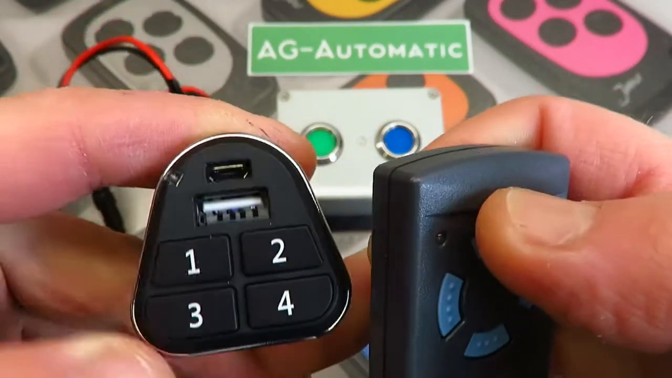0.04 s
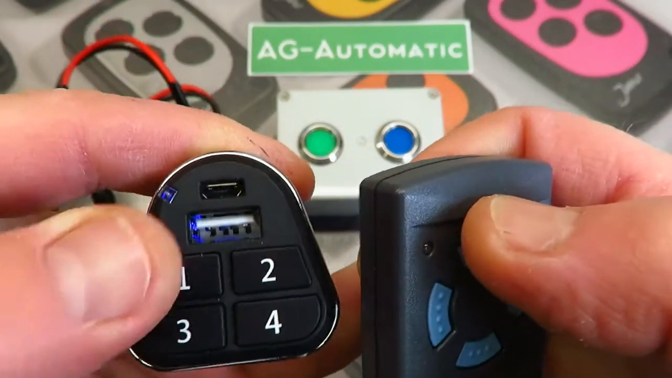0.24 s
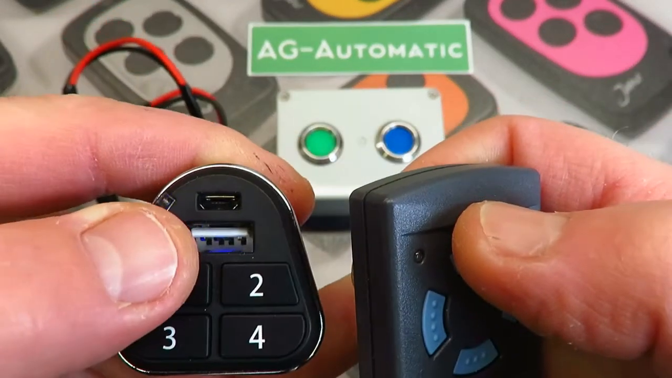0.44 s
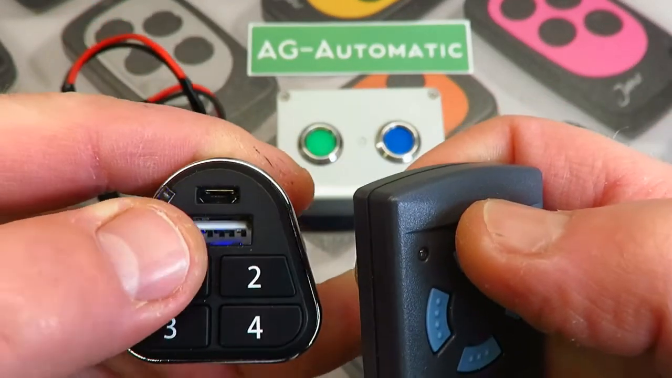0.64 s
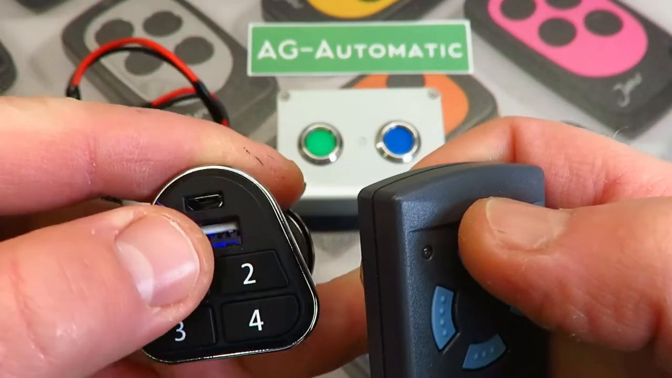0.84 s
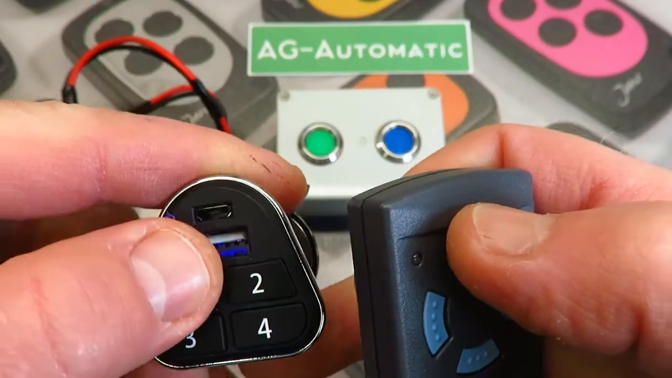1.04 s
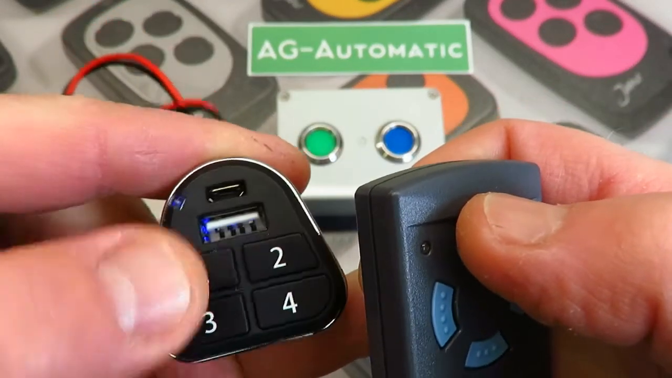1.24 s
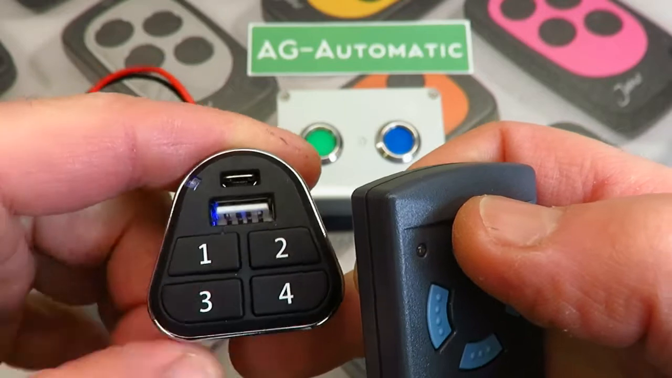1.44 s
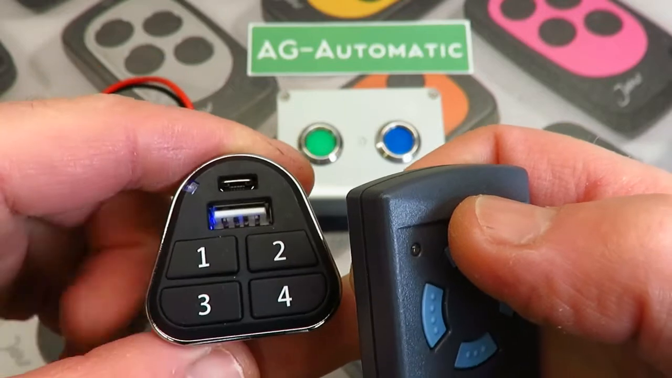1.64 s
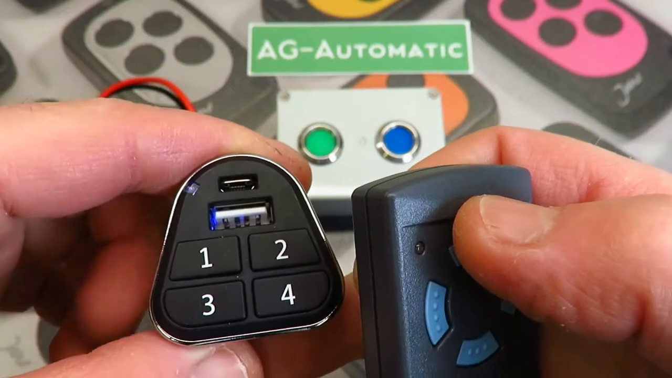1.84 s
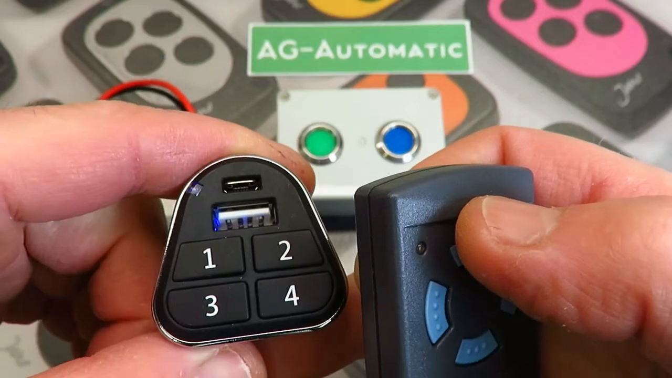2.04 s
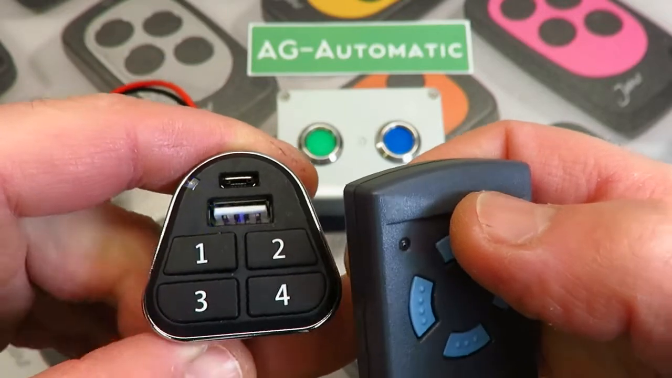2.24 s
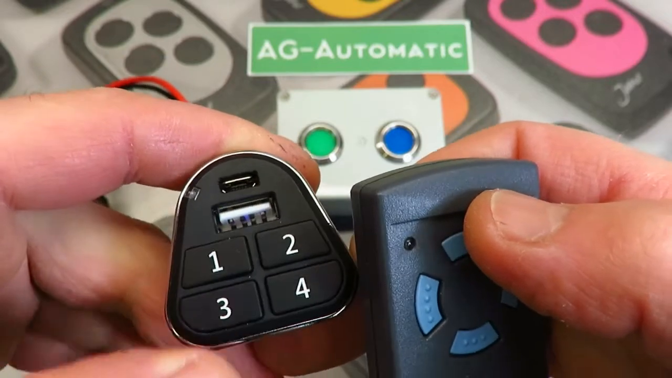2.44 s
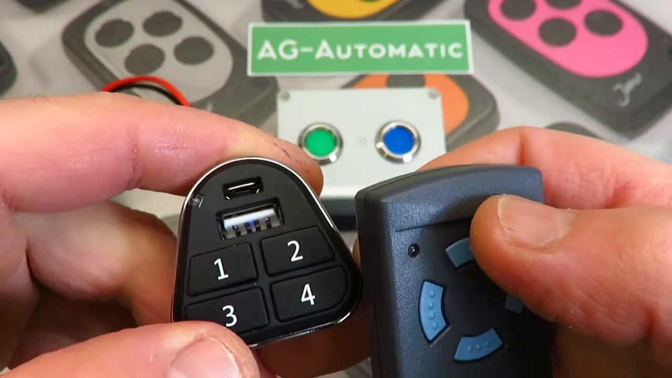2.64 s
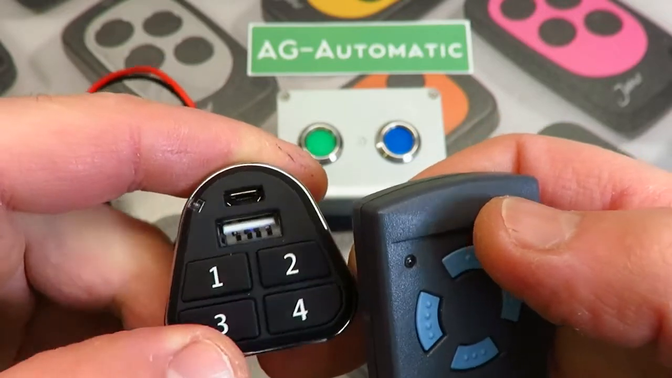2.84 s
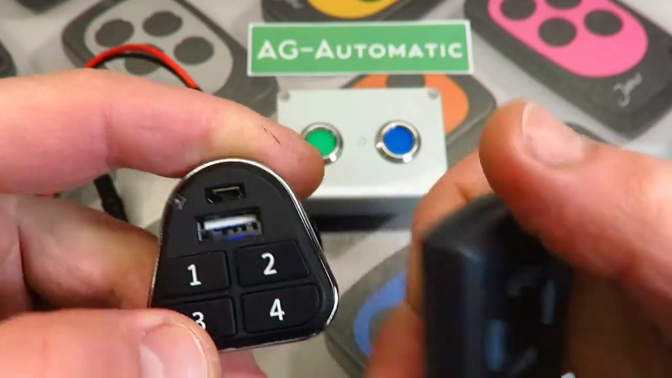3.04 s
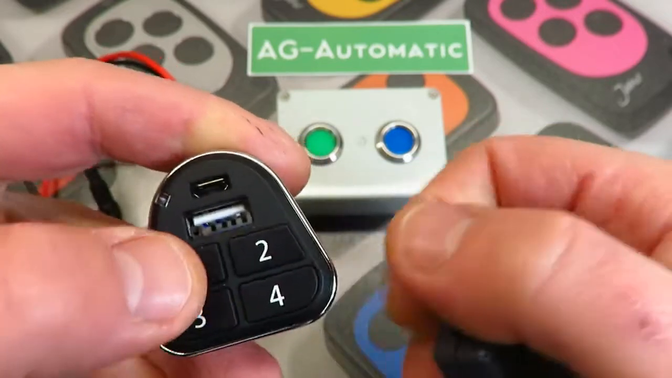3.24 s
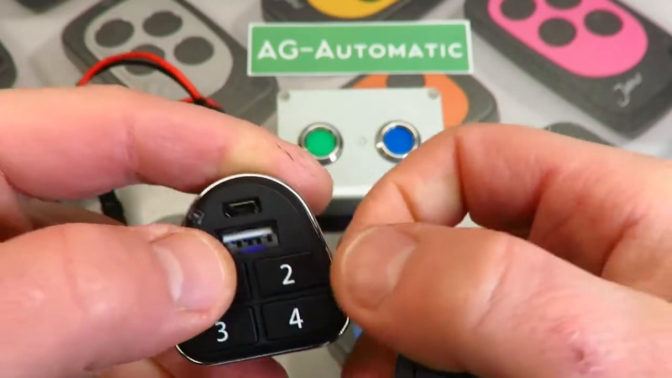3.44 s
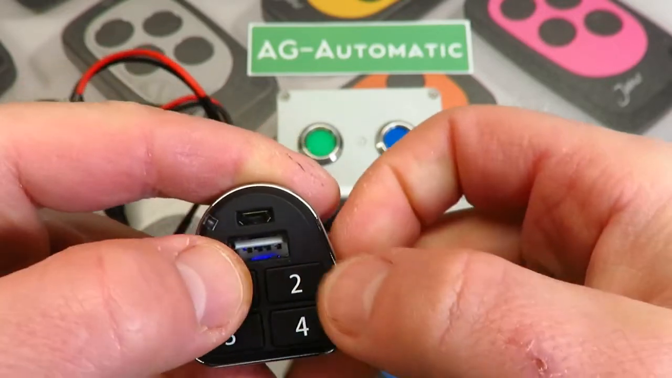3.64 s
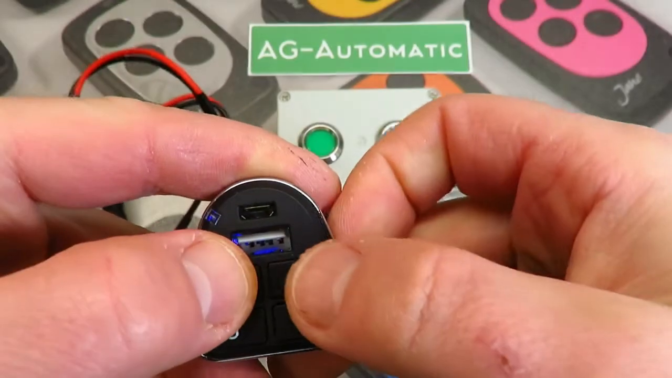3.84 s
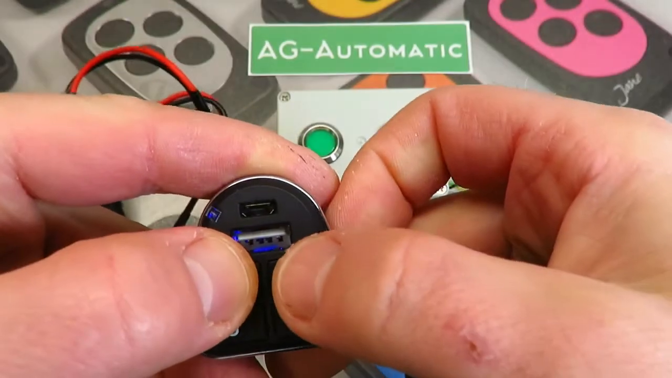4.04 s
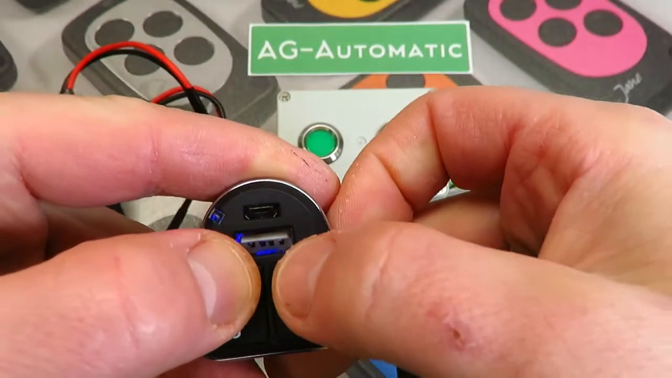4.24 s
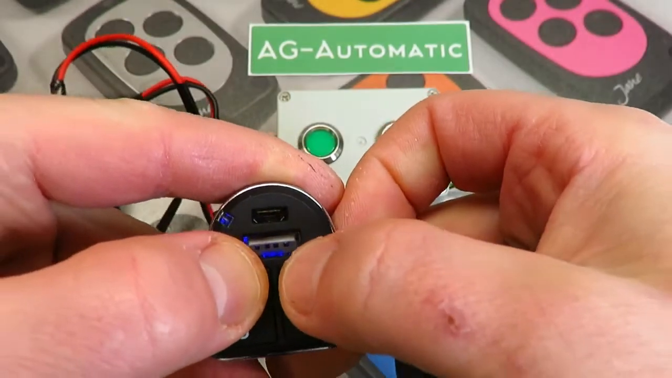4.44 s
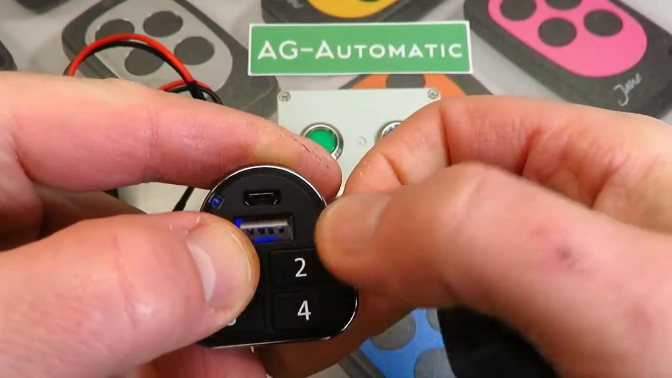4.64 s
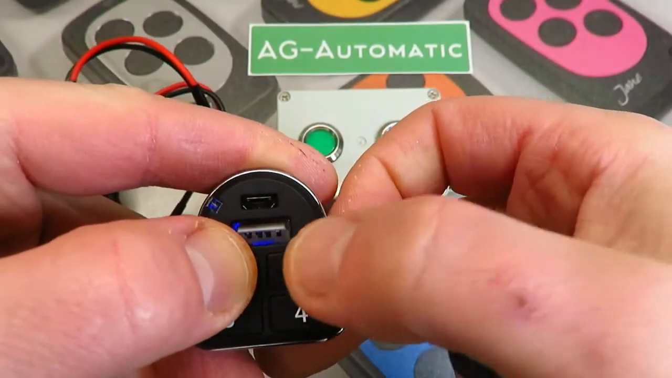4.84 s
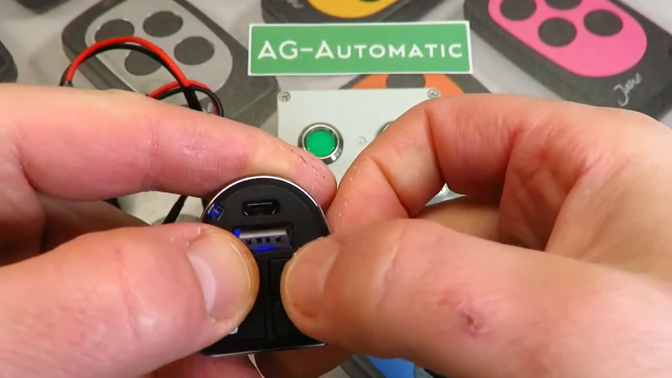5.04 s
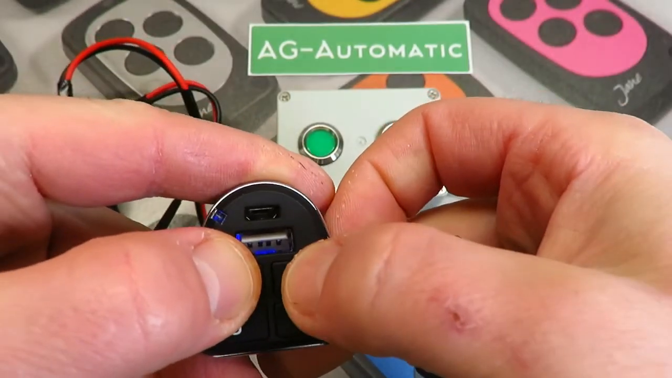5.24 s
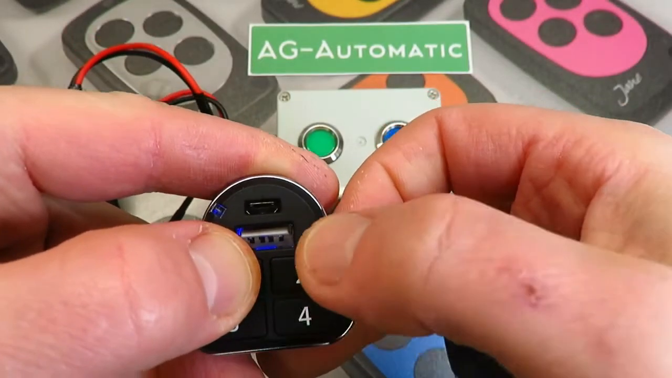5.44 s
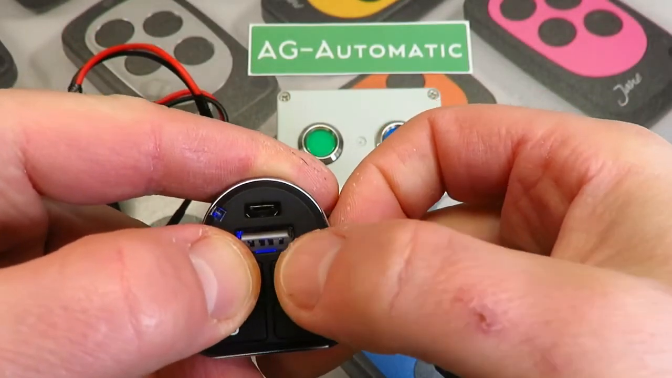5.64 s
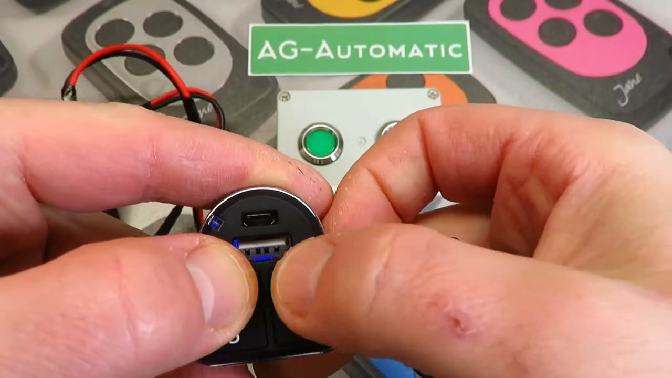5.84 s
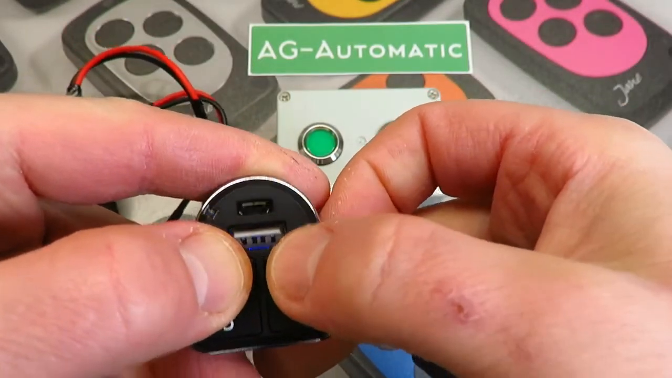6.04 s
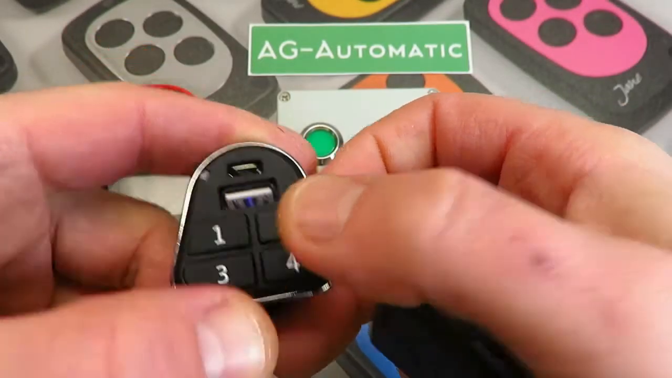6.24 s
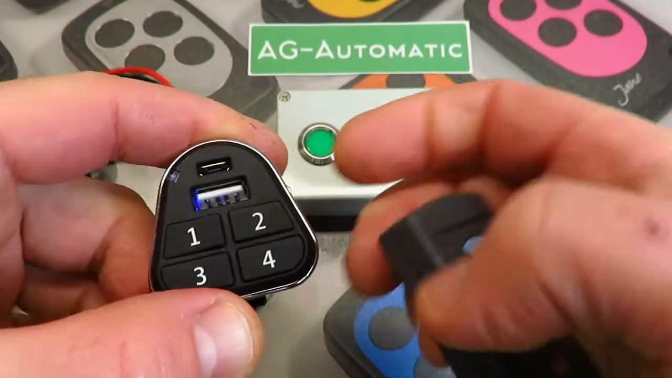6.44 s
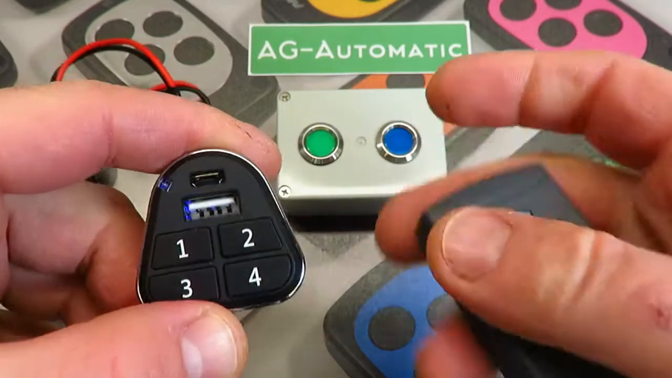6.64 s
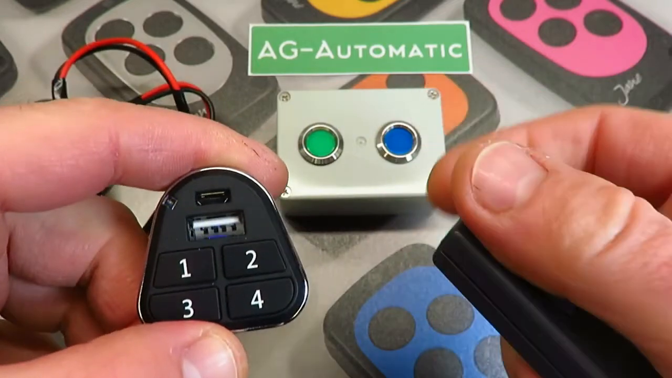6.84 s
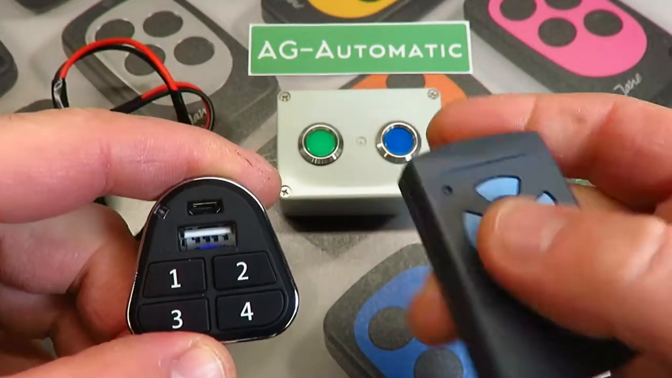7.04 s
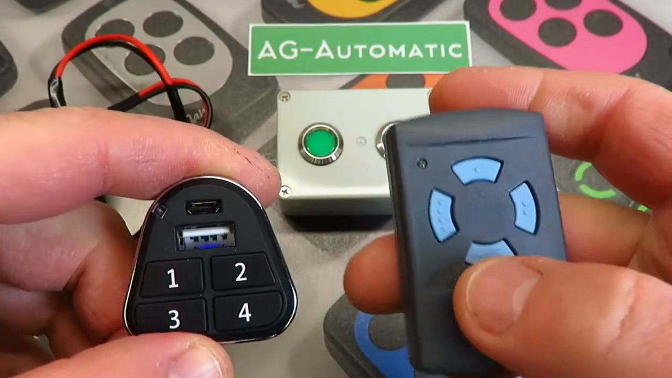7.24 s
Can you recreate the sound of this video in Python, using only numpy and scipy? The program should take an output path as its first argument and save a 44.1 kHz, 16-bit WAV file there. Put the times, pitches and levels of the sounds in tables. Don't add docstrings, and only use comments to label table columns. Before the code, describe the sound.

Small handheld remote keys snap crisply, some hard, some soft, then fingers scuff and squeak over plastic while a sleeve brushes the table.

```python
import sys
import numpy as np
from scipy import signal
from scipy.fft import rfft, irfft
from scipy.io import wavfile
from scipy.ndimage import uniform_filter1d

SR = 44100
rng = np.random.default_rng(int(sys.argv[2]) if len(sys.argv) > 2 else 0)


def digitize_waveform(pressure):
    field = np.atleast_2d(pressure).T
    bounded = np.clip(field, -1, 1)
    quanta = np.round(bounded * 32767).astype(np.int16)
    wavfile.write(sys.argv[1], SR, quanta)


def volts(x):
    e = np.asarray(x, float) / 20
    return 10 ** e


N = 322371
OPPOSITE = np.array([[1], [-1]])


def rms_one(x):
    return x / np.sqrt(np.mean(x ** 2) + 1e-20)


def resonance(x, hz, width_hz):
    r = np.exp(-np.pi * width_hz / SR)
    top = np.array([1, 0, -1]) * (1 - r * r) / 2
    return signal.lfilter(top, [1, -2 * r * np.cos(2 * np.pi * hz / SR), r * r], x)


def resonance_twice(x, hz, width_hz):
    return resonance(resonance(x, hz, width_hz), hz, width_hz)


def shaped(x, spectrum):
    hz, level_db = np.transpose(spectrum)
    grid = np.maximum(np.fft.rfftfreq(N, 1 / SR), 1)
    gain = volts(np.interp(np.log(grid), np.log(hz), level_db))
    return rms_one(irfft(rfft(x) * gain, N))


def patchy(x, depth_db):
    hz, _, spectrum = signal.stft(x, SR, nperseg=1024)
    field = rng.standard_normal(spectrum.shape)
    field = uniform_filter1d(uniform_filter1d(field, size=7, axis=0), size=5, axis=1)
    depth_db = depth_db * np.minimum(hz / 1500, 1)[:, None]
    uneven = spectrum * volts(depth_db * rms_one(field))
    return rms_one(signal.istft(uneven, nperseg=1024)[1][:N])


def stroke(rows, peaks_db, rest_db):
    t, out = np.arange(N) / SR, np.full(N, volts(rest_db))
    for (s, rise_s, fall_s, *_), peak_db in zip(rows, peaks_db):
        near = slice(max(0, round((s - 3 * rise_s) * SR)), round((s + 3 * fall_s) * SR))
        since = t[near] - s
        drop_db = 20 * np.where(since < 0, -since / rise_s, since / fall_s)
        out[near] += volts(peak_db - drop_db)
    return uniform_filter1d(out, size=400)


GROUP_EDGES_HZ = [1700, 4100, 8500]


def snaps(hits, dome, shell, lean_db, lag_s, rattle_db, shell_db, cut_hz):
    delay_s = 0.0009
    out, t = np.zeros((2, N + 8000)), np.arange(4000) / SR
    late = np.maximum(t - np.array([[0], [lag_s]]), 0)
    for s, peak_db, low_db, bright_db, air_db in hits:
        ring_db = shell_db - 0.12 * peak_db
        group = volts(np.array([low_db + 7, 0, bright_db + 8.5, air_db + 13.0]))
        phase, wobble = rng.uniform(0, 2 * np.pi, 20), rng.normal(0, 1, (20, 3))
        middle, side = rng.standard_normal((2, len(t)))
        sound = 0
        for k, (hz, length_s, t60) in enumerate(dome):
            swell = np.sin(np.pi * np.minimum(late / length_s, 1) ** 0.53)
            burst = swell * np.sin(2 * np.pi * hz * late + phase[k])
            loose = (middle + 0.3 * side * OPPOSITE) * volts(rattle_db + ring_db - 60 * t / t60)
            sound = sound + group[k] * (burst + resonance_twice(loose, hz, 0.66 * hz))
        for k, (hz, level_db, t60) in enumerate(shell):
            fade = volts(-60 * late / t60) * (1 - np.exp(-late / 0.00052))
            scatter_db = 3.0 * wobble[k, 0] + 0.5 * wobble[k, 1] * OPPOSITE
            strength = group[np.searchsorted(GROUP_EDGES_HZ, hz)] * volts(level_db + ring_db + scatter_db)
            gripped_hz = hz * (1 + 0.017 * wobble[k, 2])
            sound = sound + strength * fade * np.sin(2 * np.pi * gripped_hz * late + phase[k + 4])
        at = round((s + delay_s) * SR)
        out[:, at:at + len(t)] += volts(peak_db) * sound / np.abs(sound.mean(axis=0)).max()
    too_small_for_bass = signal.butter(3, cut_hz, "high", fs=SR, output="sos")
    out = signal.sosfilt(too_small_for_bass, out[:, :N] + 1e-18)
    ports_roll_off = signal.butter(4, 14000, fs=SR, output="sos")
    return signal.sosfilt(ports_roll_off, out) * volts([[lean_db / 2], [-lean_db / 2]])


# start_s [s], peak_db, low_db, bright_db, air_db [dB]
LEFT_KEY = [
    (0.2015, -28.5, -24, -7, -6),
    (1.0899, -6, -29, -6, -28),
    (1.304, -14, -16, -32, -33.5),
    (1.3448, -36.5, -33, -22, -45),
    (6.2571, -12, -15.5, -24, -32),
    (6.9585, -13.5, -39, -30, -27),
    (0.5004, -19, -16.5, -2, -32),
]
# pitch_hz [Hz], burst_s [s], rattle_t60_s [s]
LEFT_DOME = [(1420, 0.0037, 0.025), (2430, 0.0035, 0.025), (4100, 0.00056, 0.017), (12100, 0.00099, 0.025)]
# pitch_hz [Hz], level_db [dB in its group], t60_s [s]
LEFT_SHELL = [(872, 4, 0.025), (1360, 20, 0.015), (1770, -30, 0.02), (2218, 10.5, 0.024),
              (2690, -45, 0.057), (2800, -2.5, 0.022), (3810, -11, 0.024), (4200, -13, 0.021),
              (4740, -4.5, 0.036), (5140, -22, 0.023)]


def left_key():
    return snaps(LEFT_KEY, LEFT_DOME, LEFT_SHELL,
                 lean_db=1.5, lag_s=0.00002, rattle_db=6.5, shell_db=-11, cut_hz=520)


# start_s [s], peak_db, low_db, bright_db, air_db [dB]
RIGHT_KEY = [
    (4.4526, -3.5, -32, -12, -29.5),
    (5.2604, -2, -50, -10.5, -22),
    (5.9972, -3.5, -20.5, -10.5, -22),
]
# pitch_hz [Hz], burst_s [s], rattle_t60_s [s]
RIGHT_DOME = [(1620, 0.0041, 0.062), (2800, 0.0011, 0.03), (4860, 0.0016, 0.022), (10600, 0.00038, 0.0079)]
# pitch_hz [Hz], level_db [dB in its group], t60_s [s]
RIGHT_SHELL = [(1410, 9, 0.013), (1810, -14.5, 0.031), (2290, -2.5, 0.023), (2405, -3.5, 0.0067),
               (2630, -18, 0.012), (3220, -23, 0.045), (3940, -9.5, 0.017), (4560, 3, 0.018),
               (4860, -18, 0.018), (5530, -0.5, 0.0089), (5900, -17, 0.023), (6400, -6, 0.02)]


def right_key():
    return snaps(RIGHT_KEY, RIGHT_DOME, RIGHT_SHELL,
                 lean_db=0.5, lag_s=0.00002, rattle_db=9.5, shell_db=-13.5, cut_hz=1320)


# start_s [s], peak_db, low_db, bright_db, air_db [dB]
BRIGHT_PRESS = [
    (3.875, -1, -20.5, -9.5, -36),
    (3.9419, -30, -40, -21, -53.5),
]
# pitch_hz [Hz], burst_s [s], rattle_t60_s [s]
BRIGHT_DOME = [(1340, 0.0017, 0.026), (2730, 0.0022, 0.015), (7040, 0.0011, 0.016), (11600, 0.00066, 0.017)]


def bright_press():
    return snaps(BRIGHT_PRESS, BRIGHT_DOME, RIGHT_SHELL,
                 lean_db=0.5, lag_s=0.00002, rattle_db=4.0, shell_db=-7.5, cut_hz=690)


# start_s [s], peak_db, low_db, bright_db, air_db [dB]
RELEASES = [
    (4.6891, -13.5, -19.5, -18.5, -24.5),
    (5.1195, -28, -20, -13.5, -20.5),
    (5.441, -20, -24, -32, -44),
    (5.4534, -38, -29, -29, -38),
    (5.5078, -39, -21, -25, -30),
    (5.8138, -33.5, -33, -24, -27),
]
# pitch_hz [Hz], burst_s [s], rattle_t60_s [s]
RELEASE_DOME = [(1610, 0.0027, 0.033), (2710, 0.00155, 0.023), (4210, 0.00036, 0.02),
                (11500, 0.00036, 0.012)]


def releases():
    return snaps(RELEASES, RELEASE_DOME, RIGHT_SHELL,
                 lean_db=0.5, lag_s=0.00002, rattle_db=11.0, shell_db=-10.5, cut_hz=770)


# start_s [s], peak_db, low_db, bright_db, air_db [dB]
SKIN_TICKS = [
    (0.1297, -39.5, -18, -17, -31),
    (0.151, -38.5, -9, -1, -31),
    (0.426, -56, -14, -16, -21),
    (0.8876, -39, -12, -23, -41),
    (1.004, -43, -16, -36, -25),
    (2.4832, -40, -22, -33, -23),
    (3.3665, -27.5, -33, -22, -42),
    (6.2053, -21.5, -7.5, -33, -39),
    (6.2158, -26.5, -27, -30, -45),
]
# pitch_hz [Hz], burst_s [s], rattle_t60_s [s]
TICK = [ (1370, 0.0012, .02), (2470, 0.0023, 0.043), (4570, 0.00086, 0.022), (11000, 0.00063, .015)]


def skin_ticks():
    return snaps(SKIN_TICKS, TICK, RIGHT_SHELL,
                 lean_db=2.0, lag_s=0.00001, rattle_db=6.0, shell_db=-13, cut_hz=380)


def grains(per_s, spread_db):
    sizes = volts(spread_db * np.minimum(rng.exponential(1, N), 4)) * rng.choice([-1, 1], N)
    return rms_one(sizes * (rng.random(N) < per_s / SR))


# peak_s [s], peak_db [dB], pitch_hz [Hz]
SLIPS = [(0.2, -25, 2360), (0.8695, -32.5, 2460), (3.0565, -30, 2800), (3.262, -25, 2470),
         (3.276, -19.5, 2650), (3.3089, -23.5, 2180), (3.449, -27.5, 2410), (3.633, -19.5, 2170),
         (3.642, -19.5, 2180), (3.6594, -27, 2230), (3.8081, -33, 2800), (6.3035, -28, 2260),
         (6.7275, -48, 2210), (6.793, -20, 2350), (6.8044, -27, 2290), (6.8194, -33, 2400),
         (6.956, -12, 2270), (7.1371, -32, 2160), (7.1864, -22, 1920)]


def slips(skin_grains, sheen):
    t, out = np.arange(N) / SR, np.zeros((2, N))
    rise_db_per_s, t60_s = 2596, 0.071
    for s, peak_db, hz in SLIPS:
        near = slice(round((s - 0.05) * SR), round((s + 0.097) * SR))
        slope = np.where(t[near] < s, rise_db_per_s, -60 / t60_s)
        swell = volts(peak_db - 16.5 + (t[near] - s) * slope)
        squeak = rms_one(resonance_twice(skin_grains[near], hz, 410))
        out[:, near] += swell * (squeak + volts(-12.5) * sheen[:, near])
    return out


# peak_s, rise_s, fall_s [s], rub_db [dB], sheen_db [dB above rub]
SLIDES = [ (1.346, .015, 0.028, -50.5, -2.5), (1.59, 0.039, .06, -64.5, 2.5), (2.52, .08, 0.071, -64.5, 4),
          (3.062, 0.041, 0.049, -50.5, -3.5), (3.2, 0.037, 0.22, -54.5, -8.5), (3.29, 0.11, 0.093, -50, -5),
          (3.365, 0.065, 0.022, -44, -5), (3.47, .12, 0.15, -56.5, -8), (3.644, .075, 0.04, -41, -23),
          (3.68, .04, 0.073, -54, -7), (3.82, .04, 0.03, -52.5, -19), (4.72, 0.021, .05, -59, 9),
          (5.5, 0.044, 0.034, -56, 1), (6.27, .01, 0.0077, -35, -14), (6.312, 0.017, 0.0079, -39, -8),
          (6.44, 0.21, 0.58, -52, -19), (6.66, 0.032, 0.038, -47.5, -14), (6.731, 0.018, 0.024, -39.5, -39),
          (6.804, 0.055, 0.095, -36, -21), (6.92, 0.3, 0.063, -41.5, -11),
          (6.962, 0.038, 0.021, -26.5, -25), (6.98, 0.024, 0.041, -36.5, -6.5),
          (7.162, .063, 0.16, -38.5, -7)]
# pitch_hz [Hz], width_hz [Hz], level_db [dB]
CASE = [(1700, 45, -2), (2245, 26, 6), (2800, 95, -17), (3060, 88, -16), (4080, 19, -21)]
# pitch_hz [Hz], level_db [dB per Hz]
SHEEN = [(1760, -13), (3000, 1), (3910, -7), (5370, -13.5), (5800, -8.5), (13200, -14.5), (14700, -22),
         (16000, -54)]
# time_s [s], left_minus_right_db [dB], loose_scuff_db [dB]
GRIP = [
    (0, 1.5, -12),
    (3.0, 1.0, -17),
    (3.33, 0.5, -19),
    (3.5, 0, -1.5),
    (6.3, 1, -10.5),
    (6.6, -1, -15),
    (6.76, -3.5, -20),
    (6.9, -4.5, -7),
    (7.31, -3.5, 0.5),
]


def slides():
    rub_db, sheen_db = np.transpose(SLIDES)[3:]
    rub = stroke(SLIDES, rub_db - 2.0, rest_db=-74.5)
    shine = stroke(SLIDES, rub_db + sheen_db + 1.5, rest_db=-100)
    t = np.arange(N) / SR
    grip_s, pan_db, scuff_db = np.transpose(GRIP)
    pan_db, scuff_db = np.interp(t, grip_s, pan_db), np.interp(t, grip_s, scuff_db)
    flutter = volts(2.2 * rms_one(resonance(rng.standard_normal(N), 47.0, 110.0)))
    skin, other = grains(5000.0, 1.9), grains(5500.0, 6.1)
    body = 0
    for k, (hz, width_hz, db) in enumerate(CASE):
        sign = (-1) ** k
        body = body + sign * volts(db) * resonance(skin, hz, 2.0 * width_hz) / np.sqrt(width_hz)
    scuff = volts(scuff_db) * patchy(resonance_twice(other, 1820, 2800), 5.5)
    sheen = patchy(shaped(skin, SHEEN), 4.2) + volts(-4.0) * shaped(other, SHEEN) * OPPOSITE
    out = rub * flutter * (rms_one(body) + scuff) + shine * flutter ** 0.16 * sheen
    out += slips(other, sheen)
    return out * volts([pan_db / 2, -pan_db / 2])


def room(x):
    t60_s, level_db = 0.15, -44
    t = np.arange(round(0.4 * SR)) / SR
    middle, side = rng.standard_normal((2, len(t)))
    tail = (middle + 0.5 * side * OPPOSITE) * volts(-60 * t / t60_s) * (t > 0.002)
    tail = signal.lfilter([0.6], [1, -0.4], tail)
    return volts(level_db) * signal.fftconvolve(x, tail, axes=1)[:, :N]


# peak_s, rise_s, fall_s [s], thud_db [dB], swish_db [dB]
BRUSHES = [
    (.154, 0.0069, 0.018, -41.5, -58),
    (.43, .006, 0.03, -44.5, -60),
    (1.401, 0.076, 0.083, -44, -51),
    (3.059, 0.064, 0.072, -47.5, -66),
    (4.6, 0.053, 0.13, -57, -82),
    (6.347, 0.075, 0.12, -38, -40.5),
    (6.63, 0.095, 0.096, -46.5, -73),
    (6.68, 0.088, 0.085, -39, -50),
    (7.016, 0.027, 0.037, -62, -53),
    (7.175, 0.078, 0.077, -73, -35.5),
]
# pitch_hz [Hz], level_db [dB per Hz]
BRUSH = [(71, -29), (120, -5), (184, 4), (468, -9.5), (564, -1.5), (909, -18), (2240, -19.5), (2940, -24),
         (4810, -20.5), (7000, -36), (9100, -58), (15400, -120)]


def sleeve():
    thud, swish = rng.standard_normal((2, N))
    broken = volts(2.0 * rms_one(resonance(swish, 37.6, 70.0)))
    swish = patchy(resonance_twice(swish, 3740, 3100), 1.6)
    thud_db, swish_db = np.transpose(BRUSHES)[3:]
    rumble = stroke(BRUSHES, thud_db, rest_db=-76) * broken * shaped(thud, BRUSH)
    return rumble + stroke(BRUSHES, swish_db - 9.0, rest_db=-95) * swish


# start_s [s], peak_db [dB], pitch_hz [Hz], t60_s [s]
THUMPS = [
    (0.15, -39, 105, 0.08),
    (0.425, -34.5, 107, 0.08),
    (6.59, -41, 190, .07),
    (3.055, -43, 170, .12),
]


def thumps():
    out, t = np.zeros(N), np.arange(N) / SR
    for s, peak_db, hz, t60 in THUMPS:
        since = np.maximum(t - s, 0)
        out += volts(peak_db - 60 * since / t60) * np.sin(2 * np.pi * hz * since)
    return out


# pitch_hz [Hz], level_db [dB per Hz]
HUM = [(15, -33), (25, -11), (65, 3), (91, -3.5), (164, -6), (225, -13), (426, -15.5), (481, -18),
       (599, -19), (804, -19.5), (1440, -24), (2410, -29.5), (6740, -31), (8600, -34), (11200, -51),
       (18900, -120)]
# pitch_hz [Hz], level_db [dB per Hz]
HISS = [(24, -56), (40, -30), (127, -7), (163, -4), (243, -2), (336, -1), (454, -0.5), (541, -5),
        (2040, -9.5), (4780, -16.5), (6140, -16.5), (10900, -18), (12400, -11), (14400, -16.5),
        (15900, -12.5)]


def floor():
    hum_db, hiss_db, top_hiss_db = -50.5, -50.5, -73.5
    whine_hz, whine_width_hz, whine_db, whine_fade_s = 15654, 90, -74.5, 6.62
    white = rng.standard_normal((4, N))
    hum = signal.sosfilt(signal.butter(6, 8700, fs=SR, output="sos"), shaped(white[0], HUM))
    top = signal.sosfilt(signal.butter(2, [8500, 12500], "band", fs=SR, output="sos"), white[2])
    whine = rms_one(resonance_twice(white[3], whine_hz, whine_width_hz))
    whine = whine * volts(whine_db - 7.4 * (np.arange(N) / SR > whine_fade_s))
    middle = volts(hum_db) * patchy(hum, 3.3) + volts(top_hiss_db) * patchy(top, 6.9) + whine
    return middle + volts(hiss_db) * patchy(shaped(white[1], HISS), 1.4) * OPPOSITE


def scene():
    close = left_key() + right_key() + bright_press() + releases() + skin_ticks() + slides()
    return close + room(close) + sleeve() + thumps() + floor()


def roll_off(x):
    return signal.sosfilt(signal.butter(12, 15950, fs=SR, output="sos"), x)


def record(dry):
    return roll_off(dry)


dry = scene()
out = record(dry)
digitize_waveform(out)
```